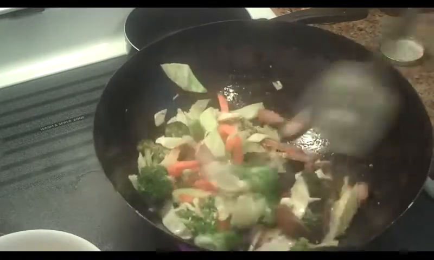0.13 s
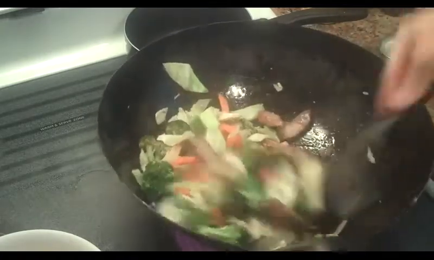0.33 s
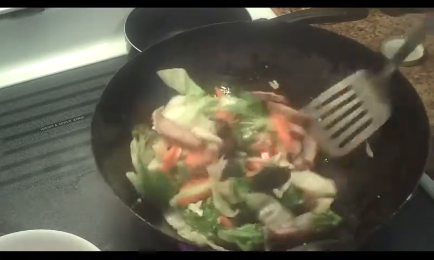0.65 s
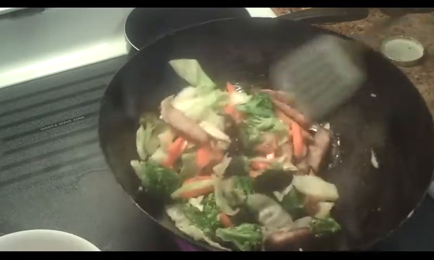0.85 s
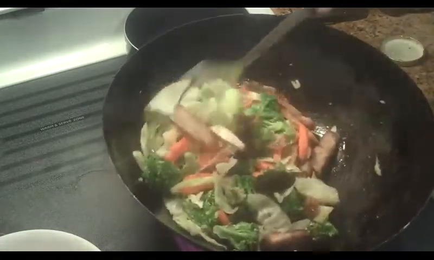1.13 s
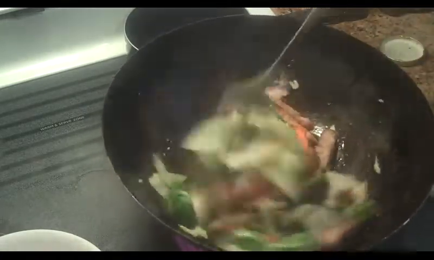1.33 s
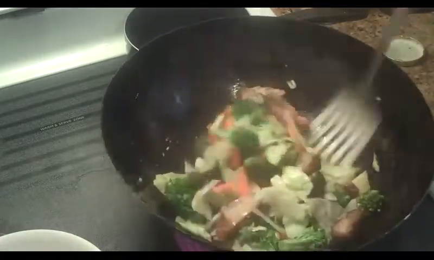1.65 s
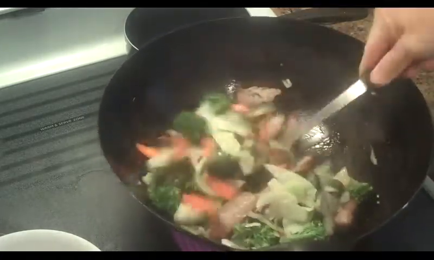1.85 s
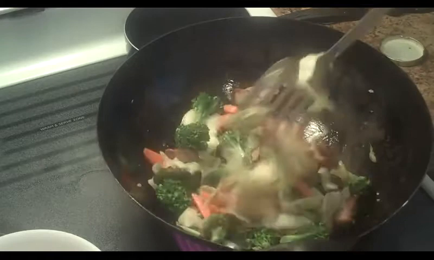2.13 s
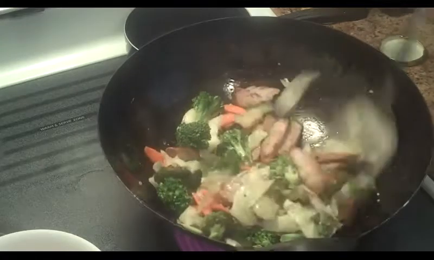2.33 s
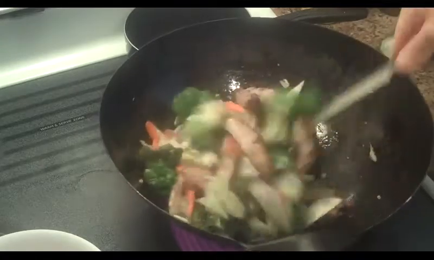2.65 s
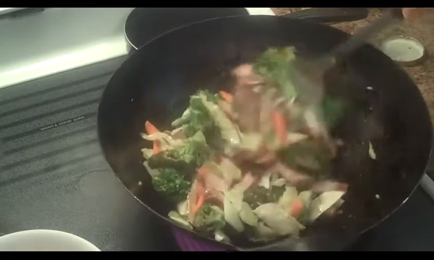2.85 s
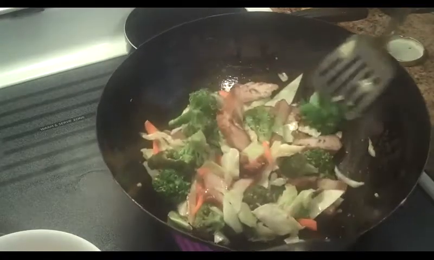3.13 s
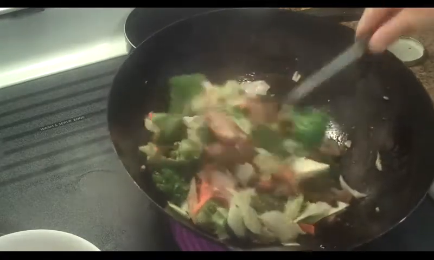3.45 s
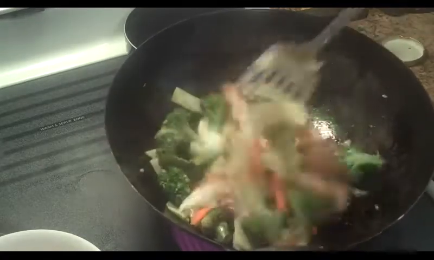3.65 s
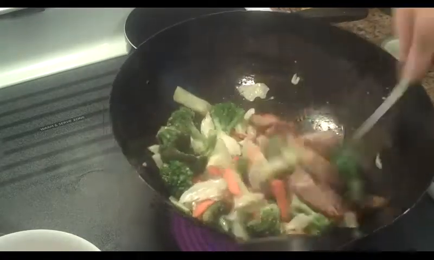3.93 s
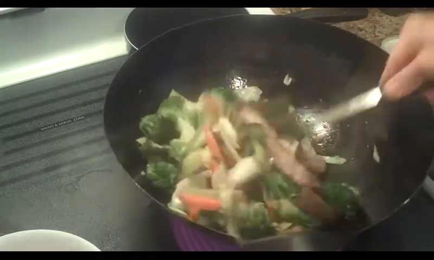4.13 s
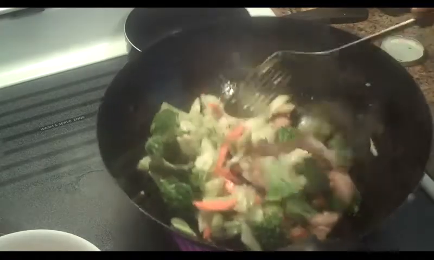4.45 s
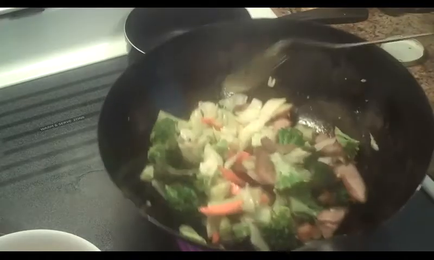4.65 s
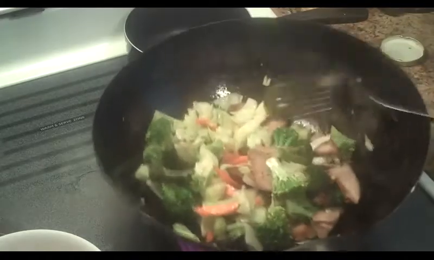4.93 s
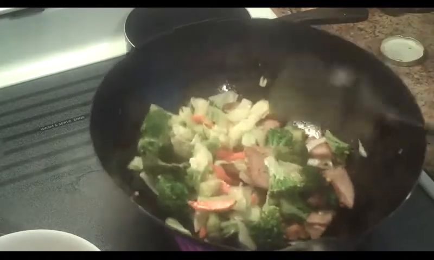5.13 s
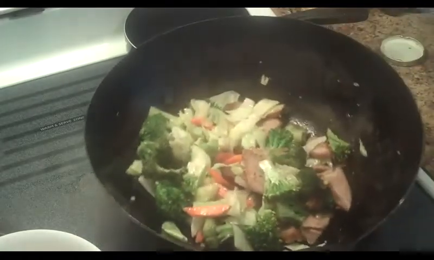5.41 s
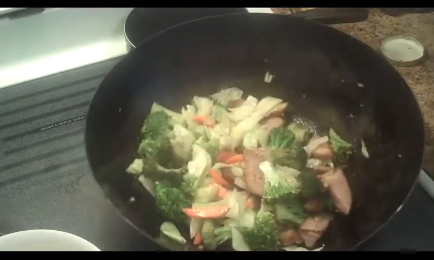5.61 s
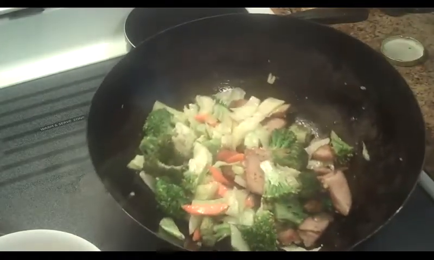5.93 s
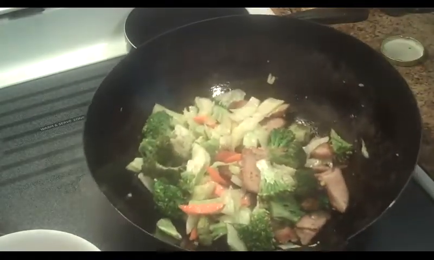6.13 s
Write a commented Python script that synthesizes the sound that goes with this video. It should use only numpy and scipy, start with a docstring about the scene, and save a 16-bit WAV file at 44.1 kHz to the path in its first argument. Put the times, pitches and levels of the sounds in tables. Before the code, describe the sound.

Food sizzles in a wok as a metal spatula strikes and scrapes, knocks twice on the rim, then clatters down.

```python
"""Stir-frying in a steel wok

One microphone near the stove in a small kitchen: vegetables and meat sizzle over the rush of a fan.
A slotted metal spatula lands in the wok and scrapes under the food, and the sizzle swells as each turn
settles on hot metal. Knocked twice on the rim, which rings on, the spatula is laid down with a clatter."""
import sys
import numpy as np
from scipy import signal
from scipy.fft import rfft, irfft
from scipy.io import wavfile
from scipy.ndimage import uniform_filter1d

SR = 44100
rng = np.random.default_rng(int(sys.argv[2]) if len(sys.argv) > 2 else 0)


def put_to_file(sound):
    """Save the sound as 16-bit audio at rate SR, in the file named by the first command-line argument."""
    columns = np.atleast_2d(sound).T  # one column per channel
    safe = np.clip(columns, -1, 1)
    whole_steps = np.round(safe * 32767)
    wavfile.write(sys.argv[1], SR, whole_steps.astype(np.int16))


N = 276948
TIME = np.arange(N) / SR

# The blade sliding under the food. Each row: time of full pressure, attack and hold in seconds,
# level in dB, blade focus in Hz, flare of steam in dB.
STROKES = [(0.161, 0.011, 0.11, -26.5, 4170, -1), (0.946, .01, .16, -26.5, 4600, 5.5),
           (1.535, .01, 0.11, -27.5, 4350, 10), (2.363, 0.15, 0.07, -35.5, 4770, 4),
           (2.555, .03, 0.025, -39, 5740, -6), (3.225, 0.12, .09, -29.5, 4200, 4),
           (3.785, .01, 0.14, -29.5, 4660, 7)]
# Modes of the blade against the wok. Each row: frequency in Hz, relative level in dB, t60 in seconds.
BLADE_MODES = [(3555, -15, 0.22), (3957, 2, 0.18), (4010, 0.5, 0.16), (4320, -7, 0.18), (4740, -8, 0.22),
               (4676, -8, 0.21), (4830, -15, 0.26), (5640, -5.5, 0.13), (5790, 2.5, 0.066), (6180, 0, 0.1),
               (7590, -10, 0.27), (8700, -11.5, 0.22)]


def sizzle(pop_db=-3, bubble_db=4.0, steam_db=-37, simmer_db=-46, steam_slope=1.2, lag_s=0.017):
    """Water bursts in the oil: countless tiny pops merge into a hiss, brighter where food meets steel."""
    # Tone of the sizzle, then the part that is bubbling, the rest being steam.
    # Each row: frequency in Hz, gain in dB.
    sizzle_spectrum = [(240, -68), (400, -8.5), (563, -10), (781, -9), (893, 0.5), (1040, -3), (1330, -2),
                       (1940, 3.5), (2120, 2.5), (3510, 1), (10700, -14), (13200, -17), (14000, -28)]
    bubble_band = [(2200, 2), (4000, 0), (6000, -32)]
    pops = rng.standard_normal(N) + undb(pop_db) * clicks(rate=3000, spread_db=3.0)
    fry = unit(shape(pops, sizzle_spectrum))
    bubbles = shape(fry, bubble_band)
    steam = fry - bubbles
    frying = frying_db()
    # Wet food smeared on bare steel flares up just behind the blade.
    flare = sum(flare_db * pressure(start + lag_s, attack + lag_s, hold)
                for start, attack, hold, _, _, flare_db in STROKES)
    bubble_level = bubble_db + frying + 0.36 * flare + 0.76 * walk(60)
    steam_level = steam_db + steam_slope * (frying - simmer_db) + flare + 0.31 * walk(45)
    return bubbles * undb(bubble_level) + steam * undb(steam_level)


def frying_db(reheat_db_per_s=13.5):
    """The frying grows as the food settles on hot metal, until the next turn lifts it."""
    # Dips after each turn or knock on the rim. Each row: quietest moment in seconds,
    # sinking time in seconds, relative level there in dB.
    dips = [(0, 0, -46.5), (.43, 0.16, -50.5), (1.29, 0.29, -46.5), (1.94, 0.45, -50), (2.65, 0.33, -48.5),
            (3.5, 0.16, -42.5), (4.13, 0.44, -46.5), (5.22, 0.35, -54), (5.55, 0.37, -55)]
    lifts = [quietest - sinking for quietest, sinking, _ in dips[1:]] + [N / SR]
    corners = []
    for (quietest, _, db), lift in zip(dips, lifts):
        corners += [(quietest, db), (lift, db + reheat_db_per_s * (lift - quietest))]
    return np.interp(TIME, *np.transpose(corners))


def scrapes(blade_db=-4, rasp_db=-4.5, grit_db=-12):
    """The edge sticks and slips on the steel, rasping and ringing the blade; burnt specks crackle."""
    # Tone of the rasp. Each row: frequency in Hz, gain in dB.
    rasp_spectrum = [(150, -47), (500, -23), (2000, -16), (3500, -15), (4000, -5), (4700, -1), (5300, -1),
                     (6300, 3), (7500, -8), (10000, -11), (14000, -34)]
    out, t = np.zeros(N), TIME[:SR // 4]
    damped = [(hz, db, t60 * 0.21) for hz, db, t60 in BLADE_MODES]  # pressed down, it rings shorter
    for start, attack, hold, db, focus_hz, _ in STROKES:
        slips = clicks(rate=2600, spread_db=3.5) * undb(1.5 * walk(130))
        blade_ring = ring(damped, t, focus_hz, octave_db=13, scatter_db=1.0, detune=0.012)
        blade = signal.fftconvolve(slips, blade_ring)[:N]
        rasp = signal.fftconvolve(slips, burst(rasp_spectrum, t, hold=0, t60=0.015))[:N]
        grit = shape(clicks(rate=880, spread_db=3.5), [(3500, -20), (7000, 0), (14000, -5)])
        stroke = undb(blade_db) * unit(blade) + undb(rasp_db) * unit(rasp) + undb(grit_db) * unit(grit)
        out += undb(db) * pressure(start, attack, hold) * stroke
    return shape(out, [(100, -28), (700, -0.5)])  # a thin edge radiates little bass


def pressure(full_at, attack, hold, ease_db_per_s=39, release_db_per_s=172):
    """One stroke, 0-1: the blade bears down, eases as it slides and lifts off."""
    t = TIME - full_at
    fall_db = ease_db_per_s * np.clip(t, 0, hold) + release_db_per_s * np.maximum(t - hold, 0)
    return np.clip(1 + t / attack, 0, 1) * undb(-fall_db)


def blows(snap_db=-7.5, rebound_s=0.0043, rebound_gain=0.88):
    """Each blow chatters briefly, rings blade and wok, and lands with a low thump."""
    # Spatula on wok, the last two on the rim. Each row: start and chatter in seconds; crack, clang and
    # blade ring in dB; blade focus in Hz; wok ring in dB, its focus in Hz and fall-off in dB per octave;
    # thud in dB; push in seconds.
    hits = [ (0.1531, 0.013, -23.5, -25, -13, 3700, -31.5, 1170, 38, -19.5, 0.0061),
            (.936, 0.007, -19, -32, -22, 4570, -42, 1340, 30, -43, 0.002),
            (1.523, 0.0069, -20.5, -29, -13.5, 4350, -44.5, 1210, 20, -19.5, 0.0015),
            (2.2396, 0.0029, -18, -23, -15, 6070, -59, 1950, 13, -29, 0.0032),
            (3.766, 0.003, -16, -25.5, -21.5, 4420, -64, 900, 1, -21, 0.0018),
            (4.913, 0.022, -15.5, -12, -12, 3700, -18.5, 1354, 17, -30, 0.0028),
            (5.068, 0.013, -14.5, -16, -18, 4970, -19.5, 1970, 10.5, -18.5, 0.0037)]
    # Tones of the crack, the edge's bright snap and the clang. Each row: frequency in Hz, gain in dB.
    crack_spectrum = [(200, -21), (1000, -9), (3650, -16), (4100, 6.5), (5000, 0), (6000, -1.5), (7300, -6),
                      (8500, -12), (11000, -18.5), (14000, -30)]
    snap_spectrum = [(3000, -22), (8000, 1), (14000, -3)]
    clang_spectrum = [(100, 5), (190, -4), (320, 5), (480, 3.5), (700, 3), (1300, 4.5), (1650, 0.5),
                      (2100, 5), (2500, 7), (3100, 1), (5000, -0.5), (12000, -20)]
    # Modes of the wok. Each row: frequency in Hz, relative level in dB, t60 in seconds.
    wok_modes = [(650, 11, 0.53), (648.2, -8.5, 4.9), (773, -3, 1.13), (862, 2, 0.88), (975.6, -2.5, 0.68),
                 (1023, -14, .2), (1180, -12, 1.1), (1213, -5, 0.25), (1279, -3.5, 0.37),
                 (1427, -21.5, 1.76), (1497, 2, 0.26), (1685, -4, 1.1), (1828, -8.5, 0.54),
                 (1966, -12, 1.16), (2050, -4, 0.32), (2210, -8, .25), (2467, 15, 0.15), (3030, -15, 0.32),
                 (3830, 7, 0.27), (4340, 2, 0.33), (4510, -5, 1.3)]
    out, t, long_t = np.zeros(N), TIME[:SR // 2], TIME[:2 * SR]
    for (start, chatter, crack_db, clang_db, blade_db, blade_hz,
         wok_db, wok_hz, falloff_db, thud_db, push) in hits:
        add(out, start, undb(crack_db) * burst(crack_spectrum, t, chatter, t60=0.077))
        add(out, start, undb(crack_db + snap_db) * burst(snap_spectrum, t, hold=0.0037, t60=0.022))
        # Food stifles chatter and clang alike.
        add(out, start, undb(clang_db) * burst(clang_spectrum, t, chatter, t60=3.1 * chatter))
        blade = ring(BLADE_MODES, t, blade_hz, octave_db=14, scatter_db=2.0, detune=0.0062)
        add(out, start, undb(blade_db) * blade)
        wok = ring(wok_modes, long_t, wok_hz, falloff_db, scatter_db=1.0, detune=0.0003)
        add(out, start, undb(wok_db) * wok)
        thud = -undb(thud_db) * np.sin(np.pi * np.minimum(t / push, 1)) ** 2
        add(out, start, thud)
        add(out, start + rebound_s * rng.uniform(0.53, 2.48), rebound_gain * thud)
    return out


def clatter(tick_db_per_octave=11.5):
    """Laid down, the spatula bounces on blade and handle; every tick excites the same resonances."""
    # The spatula rattling to rest. Each row: start in seconds, level in dB, ring focus in Hz.
    bounces = [(5.934, -25, 1320), (5.966, -32.5, 4420), (5.974, -23, 1100), (6.015, -23.5, 2310),
               (6.024, -20, 1720), (6.044, -19.5, 2320), (6.059, -20.5, 1470), (6.082, -21, 2400),
               (6.094, -22, 2330), (6.126, -21.5, 2190), (6.142, -23.5, 2600), (6.25, -40.5, 2300)]
    # Modes of the loose spatula and what it lies on.
    # Each row: frequency in Hz, relative level in dB, t60 in seconds.
    spatula_modes = [(1281, -7.5, 0.17), (1355.4, 3.5, 0.098), (1484, -10.5, 0.17), (1434, -12, 0.2),
                     (2070, -8.5, 0.27), (2260, -22, 0.14), (2350, -5, 0.16), (2368, -8.5, 0.075),
                     (2440, -22, .1), (3480, -9.5, 0.24), (3680, -15, 0.22), (3870, -8, 0.24),
                     (3920, -7, 0.22), (4700, -5.5, 0.19), (6040, -8, 0.27), (6700, -11, 0.24),
                     (7100, -14.5, 0.14), (9560, -16, .2)]
    # The handle dropping on the worktop. Each row: start in seconds, level in dB.
    knocks = [(6.059, -33), (6.082, -40), (6.126, -38.5)]
    # Tones of a tick and a knock. Each row: frequency in Hz, gain in dB.
    tick_spectrum = [(150, -44), (800, -11), (2300, 6), (3000, -3), (4700, -1), (6500, -3), (8500, -9.5),
                     (11000, -17), (14000, -25)]
    knock_spectrum = [(100, -39), (450, -25), (620, 8.5), (800, 4.5), (1100, -15), (3000, -27)]
    out, t = np.zeros(N), TIME[:SR // 2]
    tick = burst(tick_spectrum, t, hold=0.014, t60=0.13)
    for start, db, focus_hz in bounces:
        spatula = ring(spatula_modes, t, focus_hz, octave_db=7.0, scatter_db=0.0, detune=0.00057)
        # A harder contact rings higher and ticks louder.
        tick_db = -11.5 + tick_db_per_octave * np.log2(focus_hz / 2020)
        add(out, start, undb(db) * (spatula + undb(tick_db) * tick))
    for start, db in knocks:
        add(out, start, undb(db) * burst(knock_spectrum, t, hold=0.004, t60=0.12))
    return shape(out, [(80, -6), (450, 0.5)])  # so small a thing radiates little bass


def overtones(contacts, count=28, band_hz=(7000, 13800), t60=0.11, shimmer_db=-9.5):
    """Above its main modes the slotted blade has many thin, close ones; each contact sets them ringing."""
    t = TIME[:SR // 3]
    place, phase = rng.random((2, count))
    hz = np.interp(np.arange(count) + place, [0, count], band_hz)
    shimmer = np.sin(2 * np.pi * (np.outer(t, hz) + phase)).sum(axis=1) * decay(t, t60)
    shimmer /= np.linalg.norm(shimmer)
    return contacts + undb(shimmer_db) * signal.fftconvolve(contacts, shimmer)[:N]


def kitchen(direct, wet_db=-13, t60=0.28):
    """Hard walls and worktops close by give a short, slightly dull tail."""
    t = TIME[:SR // 2]
    tail = burst([(100, -27), (600, -1.5), (5000, -2.5), (14000, -6.5)], t, 0, t60)
    tail *= t > 0.006  # the first reflection comes 6 ms late
    return direct + undb(wet_db) * signal.fftconvolve(direct, tail / np.linalg.norm(tail))[:N]


def fan(level_db=-53):
    """A fan rushes steadily behind the cooking, its level wavering slightly."""
    # Fan and room tone. Each row: frequency in Hz, gain in dB.
    fan_spectrum = [(25, 2.5), (60, -17.5), (130, -18), (200, -11.5), (250, -13), (295, 2), (340, -7),
                    (470, -8.5), (590, 3.5), (730, -1.5), (900, 0.5), (1500, -5), (4000, -32), (14000, -40)]
    return undb(level_db + 1.4 * walk(9.4)) * noise(fan_spectrum, N)


def ring(modes, t, focus_hz, octave_db, scatter_db, detune, contact_s=0.0024):
    """Modes build up in a contact, which favours those near its focus and loads each differently."""
    hz, db, t60 = np.transpose(modes)
    weight, load, phase = rng.standard_normal((3, len(hz)))
    gains = undb(db - octave_db * np.abs(np.log2(hz / focus_hz)) + scatter_db * weight)
    loaded_hz = hz * (1 + detune * load)
    waves = np.sin(2 * np.pi * (np.outer(t, loaded_hz) + phase)) * decay(t[:, None], t60)
    return np.minimum(t / contact_s, 1) * (waves @ gains) / np.sqrt(np.sum(gains ** 2) / 2)


def burst(points, t, hold, t60):
    """Dense resonances as coloured noise, fed for `hold` seconds and then dying away."""
    return noise(points, len(t)) * decay(np.maximum(t - hold, 0), t60)


def clicks(rate, spread_db):
    """Random clicks, `rate` a second, many small and a few large; rms 1."""
    size = undb(spread_db * np.minimum(rng.exponential(size=N), 5))
    return unit((rng.random(N) < rate / SR) * size * rng.choice([-1, 1], N))


def noise(points, size):
    """Coloured noise of rms 1."""
    return unit(shape(rng.standard_normal(size), points))


def walk(rate_hz):
    """Smooth random wander with a spread near 1."""
    step = int(SR / rate_hz)
    stairs = np.repeat(rng.standard_normal(N // step + 1), step)
    return 1.26 * uniform_filter1d(stairs, step)[:N]


def shape(x, points):
    """Filter by (Hz, dB) points joined on a log-frequency axis."""
    hz, db = np.transpose(points)
    bin_hz = np.maximum(np.arange(len(x) // 2 + 1) * SR / len(x), 1)
    return irfft(rfft(x) * undb(np.interp(np.log(bin_hz), np.log(hz), db)), len(x))


def decay(t, t60):
    """Fall by 60 dB every t60 seconds."""
    return np.exp(-np.log(1000) * t / t60)


def undb(db):
    """Decibels to gain."""
    return 10 ** (np.asarray(db) / 20)


def unit(x):
    """Scale to an rms of 1."""
    return x / np.sqrt(np.mean(x ** 2))


def add(track, start, sound):
    """Mix a sound into the track from a given second."""
    i = int(start * SR)
    track[i:i + len(sound)] += sound[:N - i]


def scene():
    """Wok, spatula and fan reach one microphone, the same in both channels."""
    mono = fan() + kitchen(sizzle() + overtones(scrapes() + blows() + clatter()))
    return np.array([mono, mono])


def record(dry, drive=1.25, top_hz=13950):
    """The microphone rounds the loudest blows and the top is cut."""
    rounded = np.tanh(drive * dry) / drive
    return signal.sosfilt(signal.ellip(10, 0.2, 70, top_hz, fs=SR, output="sos"), rounded)


dry = scene()
out = record(dry)
put_to_file(out)
```